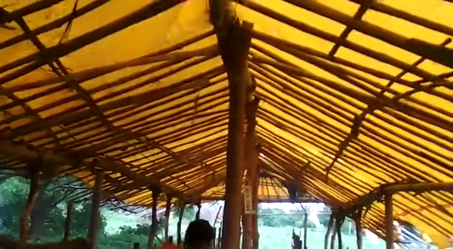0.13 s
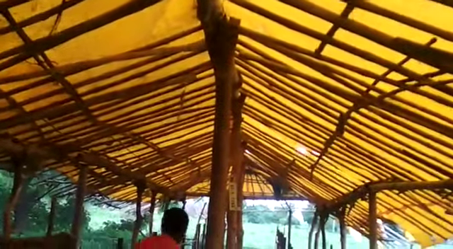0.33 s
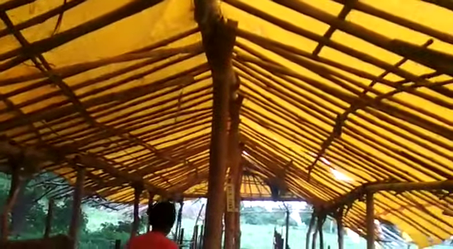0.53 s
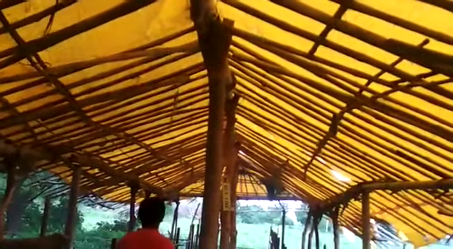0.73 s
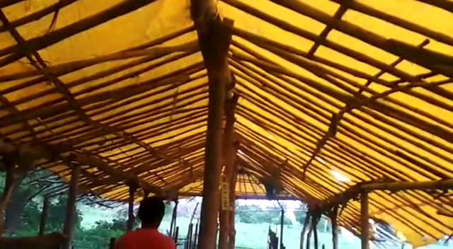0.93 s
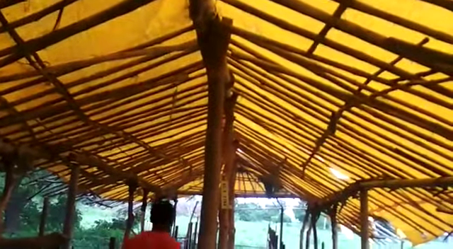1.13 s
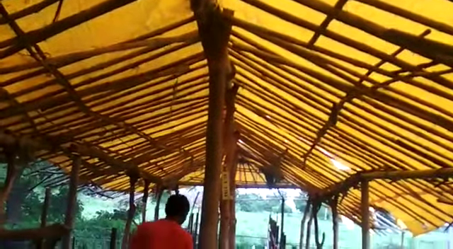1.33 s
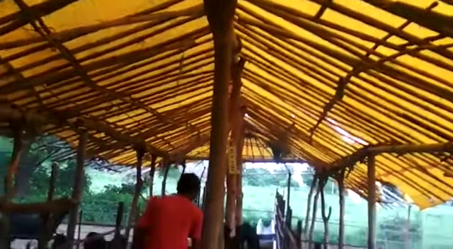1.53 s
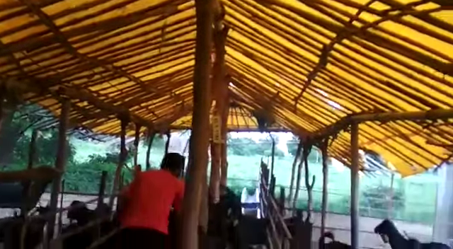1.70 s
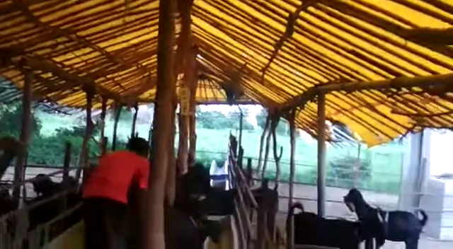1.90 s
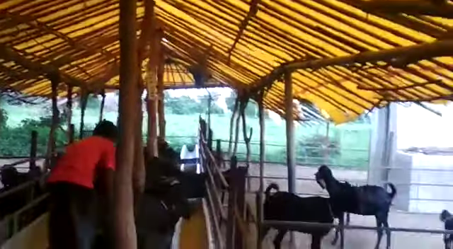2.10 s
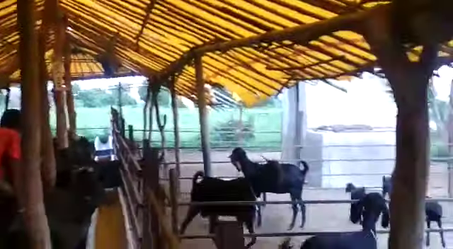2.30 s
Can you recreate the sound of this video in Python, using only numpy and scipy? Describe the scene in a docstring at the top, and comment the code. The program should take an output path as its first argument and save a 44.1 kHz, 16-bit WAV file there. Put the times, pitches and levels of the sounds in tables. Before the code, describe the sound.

Woody hoof knocks with bright cracks come first, pause for a soft drag in straw, then resume. A weak distant goat bleat follows, then a last heavy cluster and small ticks, in an airy shed with wind thumping the stereo microphone, mostly right.

```python
"""Goats in an open pole shed, over the murmur of the yard and wind buffeting two ports, mostly the right.
Hooves knock on a raised plank floor from the start: noise bursts, plank tones and a bright crack.
Near half a second hooves drag in straw, as flickering noise; then more knocks come.
After 1.4 s a far kid bleats thinly, in quavering harmonics with rasp, breath and a falling squeak.
The last strong knocks follow at about 2 s, then fainter hoof sounds and small ticks."""
import sys
import numpy as np
from scipy import signal
from scipy.fft import rfft, irfft, next_fast_len
from scipy.io import wavfile
from scipy.ndimage import uniform_filter1d, map_coordinates

SR = 44100
rng = np.random.default_rng(int(sys.argv[2]) if len(sys.argv) > 2 else 0)


def invert_db(x):
    """Field ratio 10**(x/20) for x, a level in decibels (scalar or array-like)."""
    u = np.asarray(x, float) / 20
    return 10 ** u


def materialize(psi):
    """Save the field psi as 16-bit PCM at rate SR to the path in sys.argv[1].

    A 1-D psi becomes a single channel; in a 2-D psi each row is a channel.
    """
    bounded = np.clip(np.atleast_2d(psi).T, -1, 1)
    quanta = np.round(bounded * 32767).astype(np.int16)
    wavfile.write(sys.argv[1], SR, quanta)


N = 108133  # length in samples


def unit(x):
    """Scale to rms 1."""
    return x / np.sqrt(np.mean(x ** 2) + 1e-20)


def along(points, hz):
    """Read (Hz, value) points on a log frequency axis; the end values hold."""
    f, v = np.transpose(points)
    return np.interp(np.log(hz + 1), np.log(f + 1), v)


def curve(rows, index=1):
    """One column of a timed table, one value per sample; the end values hold."""
    rows = np.array(rows)
    return np.interp(np.arange(N) / SR, rows[:, 0], rows[:, index])


def wobble(rate, size=N):
    """A smooth random curve, rate knots a second."""
    knots = rng.standard_normal(int(size * rate / SR) + 4)
    return map_coordinates(knots, [np.arange(size) * rate / SR])


def add(out, x, s):
    """Mix x into out from time s."""
    out[:, max(round(s * SR), 0):][:, :x.shape[1]] += x


def ports(hz, z):
    """Two unrelated spectra become what the left and right ports hear."""
    # how alike the two sides are: frequency_hz, likeness (0 to 1)
    port_likeness = [(150, .92), (350, .98), (700, .82), (1400, .62), (3000, .55)]
    # left over right: frequency_hz, level_db
    left_over_right = [(500, -0.5), (1300, 5), (2400, -1), (15000, 1)]
    left_lag_s = 6e-5
    top_lag_rad = 0.87  # the lag stops growing in phase where the phone's body scatters
    turn = (np.arccos(np.clip(along(port_likeness, hz), -1, 1)) / 2)[:, None]
    mid, side = z[0] * np.cos(turn), z[1] * np.sin(turn)
    # each side takes half of the level difference and half of the lag
    lag = np.exp(-1j * np.minimum(np.pi * hz * left_lag_s, top_lag_rad))
    half = (invert_db(along(left_over_right, hz) / 2) * lag)[:, None]
    return np.array([(mid + side) * half, (mid - side) / half])


def rush(spectrum, size, t60=1e6):
    """Stereo noise starting near rms 1, in uneven patches, each band dying at its own speed."""
    # how long each band rings: frequency_hz, share of t60
    ring_share = [(150, 1.034), (600, 0.64), (2500, 0.66), (6000, 0.59), (14000, 0.78)]
    patch_db = 2.5  # noise comes in small louder and softer patches
    curl = 1.303  # tails hang on, then fall faster
    hz, t, z = signal.stft(rng.standard_normal((2, size)), SR, nperseg=256)
    colour = invert_db(spectrum(hz))
    colour = (colour / np.sqrt(np.mean(colour ** 2)))[:, None]
    patches = uniform_filter1d(rng.standard_normal(z.shape[1:]), size=3, axis=0)
    patches = unit(uniform_filter1d(patches, size=8, axis=1))
    band_t60 = (t60 * along(ring_share, hz))[:, None]
    gain = colour * invert_db(patch_db * patches - 60 * (t / band_t60) ** curl)
    return signal.istft(ports(hz, z * gain), SR, nperseg=256)[1][:, :size]


def hiss(rows, spectrum):
    """Flickering noise that follows a level table and is silent outside it."""
    t = np.arange(N) / SR
    flicker_db = 2.5 * wobble(30.25)
    level = invert_db(curve(rows) + flicker_db) * (t > rows[0][0]) * (t < rows[-1][0])
    return level * rush(lambda f: along(spectrum, f), N)


def yard():
    """The murmur of the yard: steady coloured noise whose level drifts slightly."""
    # tone of the murmur: frequency_hz, level_db (per Hz)
    yard_tone = [(100, -5.5), (200, -10), (400, -17), (1000, -22), (3000, -31.5), (10000, -28),
                 (16000, -30.5)]
    return invert_db(-67.5 + wobble(8.56)) * rush(lambda f: along(yard_tone, f), N)


def wind():
    """Low lumps of pressure, unrelated at the two ports, with single thumps on the right."""
    # tone of the wind: frequency_hz, level_db (per Hz)
    rumble = [(15, 1.5), (40, -2), (100, -12), (190, -23.5), (400, -40), (800, -70)]
    # gusts at the right port: time_s, level_db (before the lift below)
    gusts = [(0, -38.5), (.07, -39.5), (.12, -32.5), (.3, -42.5), (.58, -51.5), (.66, -36), (.76, -60),
             (.82, -43.5), (.98, -35), (1.1, -56), (1.24, -78), (1.28, -40), (1.4, -61), (1.69, -64.5),
             (1.73, -41), (1.86, -37), (2.0, -44), (2.25, -36.5), (2.35, -60), (2.45, -64)]
    # wind thumps: centre_s, peak_db (before polarity), length_s, polarity (signed factor)
    thumps = [(0.028, -23, 0.007, -1.12), (0.813, -31.5, 0.0073, -0.74), (0.966, -12.5, 0.0079, -0.27),
              (1.746, -27.5, 0.0051, 0.78), (1.916, -16, 0.0035, 0.67)]
    lift_db, right_lump_db = 2.0, 1.9
    left_db, left_lump_db = -6, 3.5
    lee_share = 0.22  # the sheltered left port feels part of each gust
    m, t = next_fast_len(N), np.arange(N) / SR
    hz = np.fft.rfftfreq(m, 1 / SR)
    noise = irfft(rfft(rng.standard_normal((2, m))) * invert_db(along(rumble, hz)), m)[:, :N]
    gust_db = curve(gusts)
    right = invert_db(gust_db + lift_db + right_lump_db * wobble(10.53)) * unit(noise[1])
    lee_db = np.mean(gust_db) * (1 - lee_share) + lee_share * gust_db
    left = invert_db(lee_db + left_db + left_lump_db * wobble(9.4)) * unit(noise[0])
    for s, db, length, sign in thumps:
        u = (t - s) / length
        right = right + sign * invert_db(db) * (1 - u ** 2) * np.exp(-u ** 2 / 2)
    return np.array([left, right])


def scuff():
    """Hooves dragging in straw: bright flickering noise that swells and fades."""
    # strength of the drag: time_s, level_db
    drag = [(.46, -109), (.5, -71.5), (.58, -63.5), (.7, -64), (.79, -83)]
    # tone of the straw: frequency_hz, level_db (per Hz)
    straw = [(2000, 2.5), (4000, 2.5), (6000, 8.5), (9000, 2), (10500, 0), (16000, -28)]
    return hiss(drag, straw)


def breath():
    """Air in the bleat: a high band of flickering noise."""
    # strength of the air: time_s, level_db
    airflow = [(1.41, -89), (1.44, -63), (1.95, -68.5), (2.03, -102)]
    # tone of the air: frequency_hz, level_db (per Hz)
    air_tone = [(8000, -24), (9600, -4), (11800, -4.5), (12400, -36)]
    return hiss(airflow, air_tone)


def squeak(t):
    """A short tone that falls in pitch, swelling and fading once."""
    start_s, length_s, level_db = 1.842, .055, -48
    start_hz, fall_hz_per_s = 1590, 2900
    u = np.clip(t - start_s, 0, length_s)
    swell = invert_db(level_db + 3.1 * wobble(150)) * np.sin(np.pi * u / length_s)
    return swell * np.sin(2 * np.pi * (start_hz - fall_hz_per_s * u / 2) * u)


def bleat():
    """A quavering harmonic voice with rasp and squeak, shaped by the throat and blurred by the shed."""
    # the far kid's voice, before quaver and throat: time_s, pitch_hz, level_db
    call = [(1.41, 534, -87), (1.435, 530, -71), (1.55, 548, -68), (1.64, 563, -67), (1.74, 577, -64.5),
            (1.82, 575, -69), (1.87, 560, -99)]
    # how the throat shapes the harmonics: frequency_hz, level_db
    throat = [(550, -20), (1100, -13), (1650, -4), (2200, -26), (3600, -19), (5200, -11), (6900, 8),
              (7800, -2), (9000, -30)]
    # tone of the throat noise: frequency_hz, level_db (per Hz)
    rasp_tone = [(5400, -36), (6900, 0), (8800, -8), (10000, -40)]
    quaver_per_s, quaver_db, quaver_pitch, jitter = 13.3, 3.5, .007, .0045  # pitch swings are shares
    hoarse_db, hoarse_per_s, rasp_db = 4.5, 60, 3.5
    bright_db_per_db = .12  # each higher harmonic gains more from effort
    wet_db, shed_t60_s = -5, .2
    t = np.arange(N) / SR
    quaver = np.cos(2 * np.pi * quaver_per_s * (t - call[1][0]) - 1 + .3 * wobble(6.07))
    hz = curve(call) * (1 + quaver_pitch * quaver + jitter * wobble(60))
    call_db = curve(call, index=2)
    held_db = call_db - np.max(call_db)
    phase = 2 * np.pi * np.cumsum(hz) / SR
    voice = np.zeros(N)
    for k in range(1, 16):
        harmonic_db = along(throat, k * hz) + k * bright_db_per_db * held_db
        harmonic_db = harmonic_db + hoarse_db * wobble(hoarse_per_s)
        voice += invert_db(harmonic_db) * np.sin(k * phase + k * k)
    sounding = (t > call[0][0]) * (t < call[-1][0])
    effort = sounding * invert_db(call_db + quaver_db * quaver)
    x = effort * voice + squeak(t)
    # the shed's echo is a fading noise tail, different on each side
    tail = rng.standard_normal((2, SR // 3)) * invert_db(-60 * t[:SR // 3] / shed_t60_s)
    wet = signal.fftconvolve(x[None], tail / np.linalg.norm(tail[0]), axes=1)[:, :N]
    rasp = effort * invert_db(rasp_db) * rush(lambda f: along(rasp_tone, f), N)
    direct = np.array([x, np.roll(x, shift=-2)])  # the right port hears it two samples sooner
    return direct + invert_db(wet_db) * wet + rasp


def ticks():
    """Grit ticks and soft bumps: short bursts of noise, each around one pitch."""
    # each tick: start_s, peak_db (nominal), pitch_hz, width_octaves
    grit_ticks = [(0.417, -52, 13900, 0.37), (0.538, -47.5, 245, 0.32), (0.947, -37.5, 6260, 0.87),
                  (1.961, -44.5, 252, 0.44), (2.295, -55, 13500, 0.18), (2.385, -40.5, 200, 0.35),
                  (2.301, -43.5, 298, 0.8)]
    rms_under_peak_db, ring_t60_s, rise_s = -7.5, 0.21, 0.00072
    out, size = np.zeros((2, N + SR)), SR // 2
    t = np.arange(size) / SR
    for s, db, hz, width in grit_ticks:
        grit = rush(lambda f: -6 * (np.log2((f + 1) / hz) / width) ** 2, size, ring_t60_s)
        add(out, invert_db(db + rms_under_peak_db) * (1 - np.exp(-t / rise_s)) * grit, s)
    return out[:, :N]


def hooves():
    """Each blow cracks brightly and sets the planks ringing; heavier blows sound deeper."""
    # blows: start_s, peak_db (nominal), crack_db (treble over the planks), ring_t60_s, rise_s
    hoof_blows = [(.001, -40, -0.5, 0.26, 0.0013), (.009, -24, -3.5, 0.31, 0.0059),
                  (0.173, -23, -7.5, 0.36, 0.0063), (0.244, -25, -9, 0.35, 0.019),
                  (0.354, -31, -35, 0.31, 0.0028), (0.479, -54, -26, 0.79, 0.024),
                  (0.55, -53, -12, 0.41, 0.0065), (0.646, -55.5, -9, 0.34, 0.0082),
                  (.835, -31.5, 2, 0.38, 0.0034), (.866, -25.5, -35, 0.3, 0.013),
                  (1.126, -23.5, -10.5, 0.33, 0.0075), (1.146, -28.5, -4.5, 0.44, 0.0062),
                  (1.175, -20.5, -18.5, 0.28, 0.011), (1.70, -43, -6, 0.48, 0.044),
                  (1.79, -45, -18, 0.46, 0.016), (1.857, -42, -10.5, 0.54, 0.0058),
                  (1.931, -52, -8.5, 1, 0.0033), (2.022, -19.5, -10.5, 0.34, 0.016),
                  (2.052, -31.5, -7.5, 0.4, 0.0094), (2.099, -23.5, -4, 0.38, 0.0039),
                  (2.12, -27, -37, 0.36, 0.009), (2.255, -48, -17, 0.33, 0.016)]
    # tone of the planks' noise: frequency_hz, level_db (per Hz)
    planks = [(110, -28), (190, -4), (400, -0.5), (600, -1.5), (1150, -1), (1700, -6), (2300, -18),
              (3500, -30), (6000, -60)]
    # ringing tones of the planks, varied a little per blow: pitch_hz, level_db, t60_s
    plank_modes = [(388, -7, 0.23), (693, 3, 0.06), (1150, 7.5, 0.027), (1441, -4, 0.051)]
    # tone of the crack: frequency_hz, level_db (per Hz)
    crack_tone = [(1060, -8.5), (1800, -3.5), (2670, -2.5), (3510, -0.5), (9860, -6), (15300, -9.5),
                  (16000, -38)]
    rms_under_peak_db = -7.5
    depth_hz, depth_db_per_db, heavy_db = 470, 0.6, -22  # heavier blows reach deeper
    shuffle_db_per_db, shuffle_per_s = .09, 70  # light steps break up into small stirrings
    snap_db, snap_s = 8, .005  # the first bright instant over the crack; snap_s adds to the rise
    out, size = np.zeros((2, N + SR)), SR // 2
    t = np.arange(size) / SR
    for s, db, crack_db, t60, rise in hoof_blows:
        ring = np.zeros(size)
        for hz, mode_db, mode_t60 in plank_modes:
            fade = invert_db(mode_db + rng.normal(0, 3) - 60 * t / mode_t60)
            ring += fade * np.sin(2 * np.pi * (hz * rng.normal(1, 0.03) * t + rng.random()))
        depth_db = depth_db_per_db * (db - heavy_db)
        body = rush(lambda f: along(planks, f) + depth_db / (1 + (f / depth_hz) ** 4), size, t60) + ring
        snap = snap_db * np.exp(-(t / (rise + snap_s)) ** 2)
        crack = invert_db(crack_db + snap) * rush(lambda f: along(crack_tone, f), size, t60)
        chatter = invert_db(shuffle_db_per_db * max(heavy_db - db, 0) * wobble(shuffle_per_s, size))
        onset = 1 - np.exp(-(t / rise) ** 2)
        add(out, invert_db(db + rms_under_peak_db) * chatter * onset * (body + crack), s - .001)
    return out[:, :N]


def scene():
    """All sources together, from the background to the hooves."""
    return yard() + wind() + scuff() + breath() + bleat() + ticks() + hooves()


def band_limit(x):
    """A steep low-pass at the top of the band."""
    return signal.sosfilt(signal.butter(12, 16620, fs=SR, output="sos"), x)


def record(dry):
    """Take the finished stereo mix as the phone stores it."""
    return band_limit(dry)


dry = scene()
out = record(dry)
materialize(out)
```